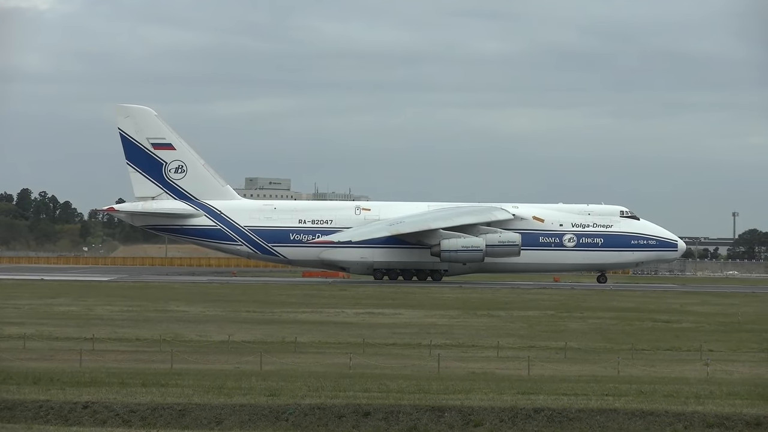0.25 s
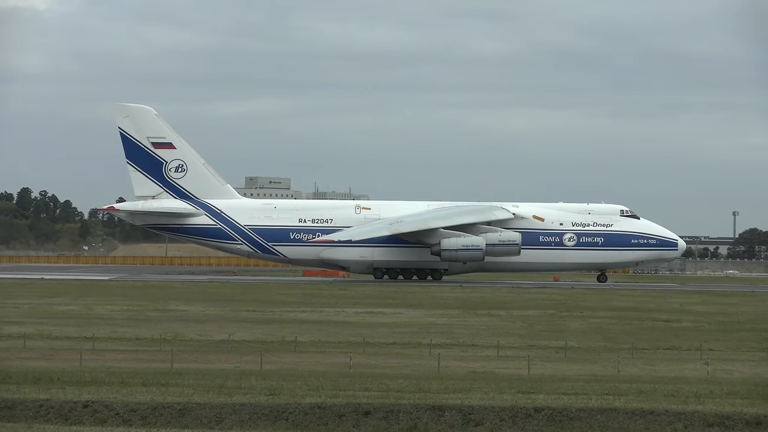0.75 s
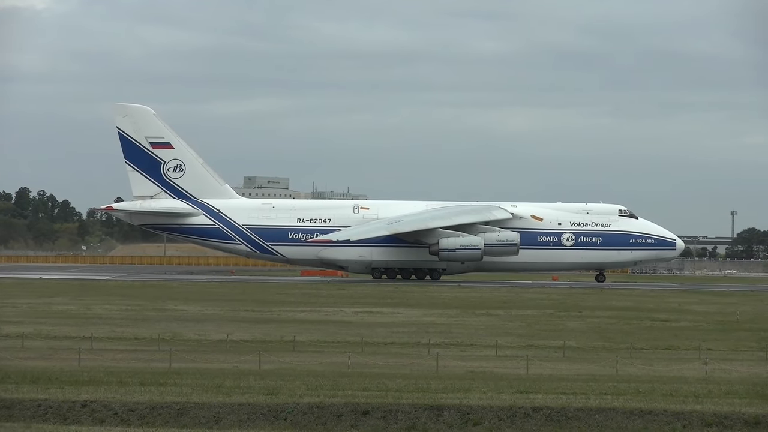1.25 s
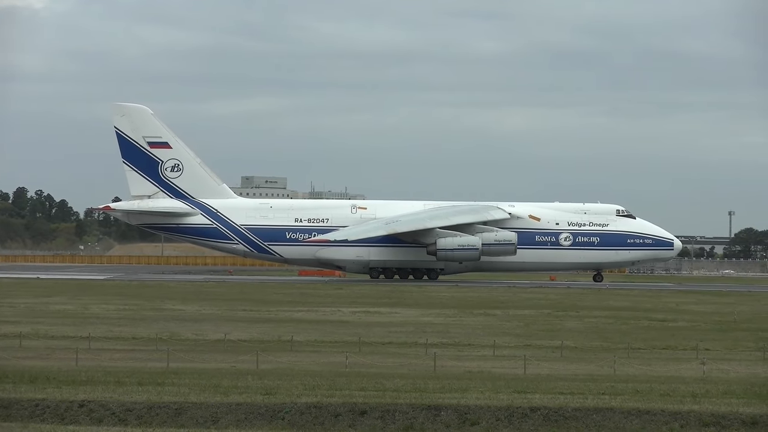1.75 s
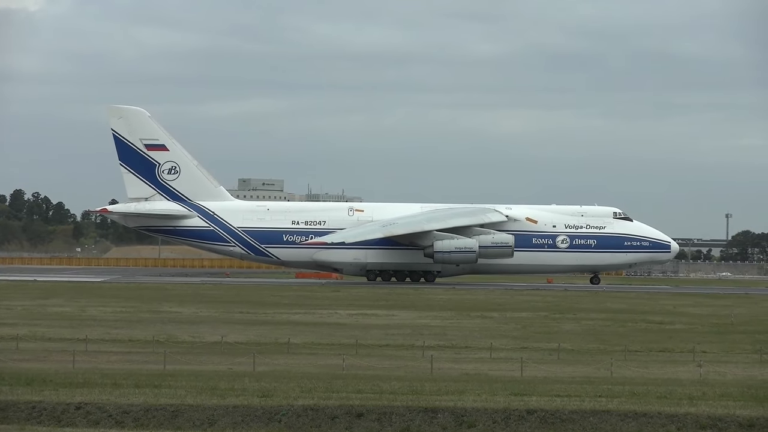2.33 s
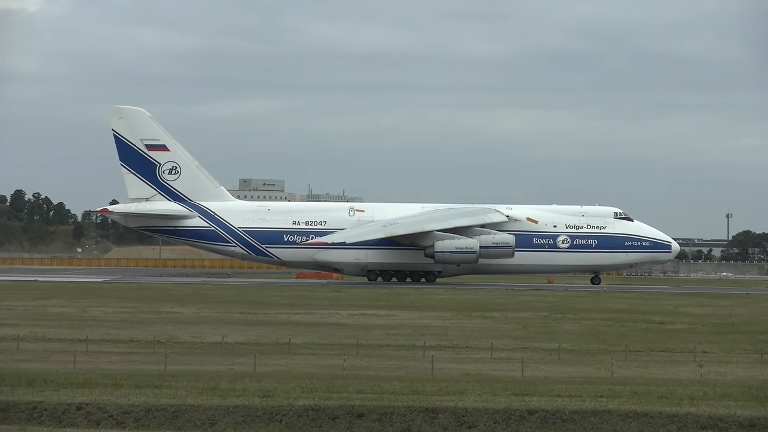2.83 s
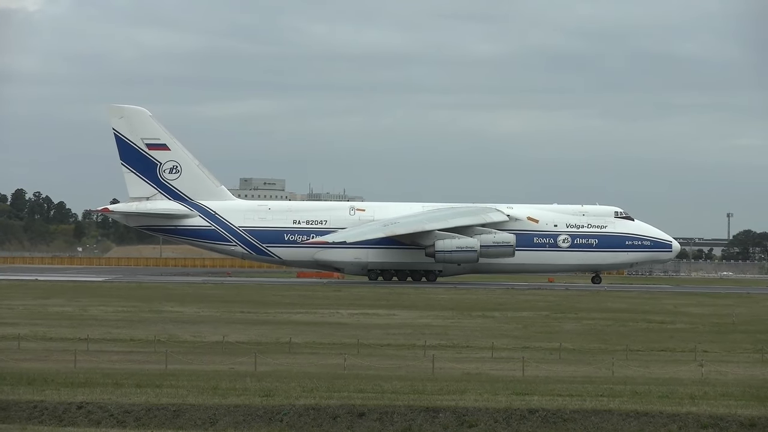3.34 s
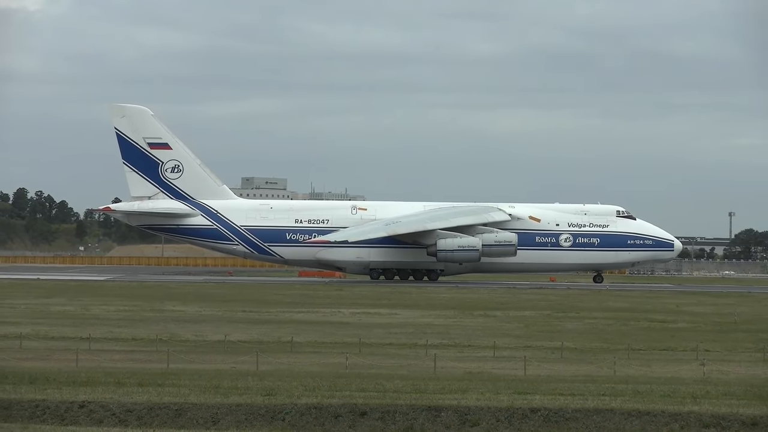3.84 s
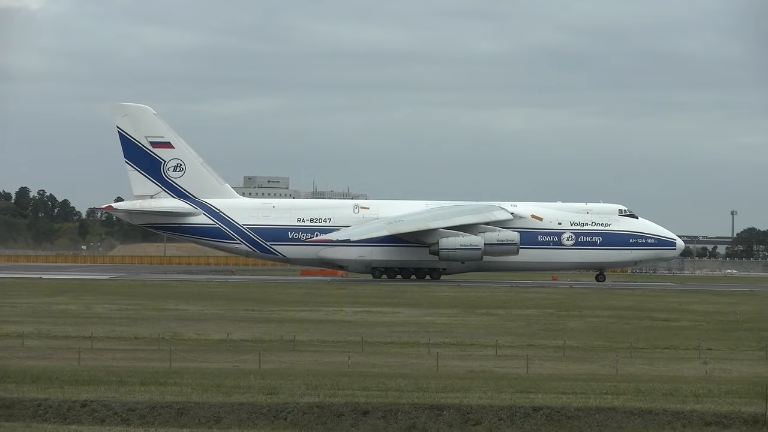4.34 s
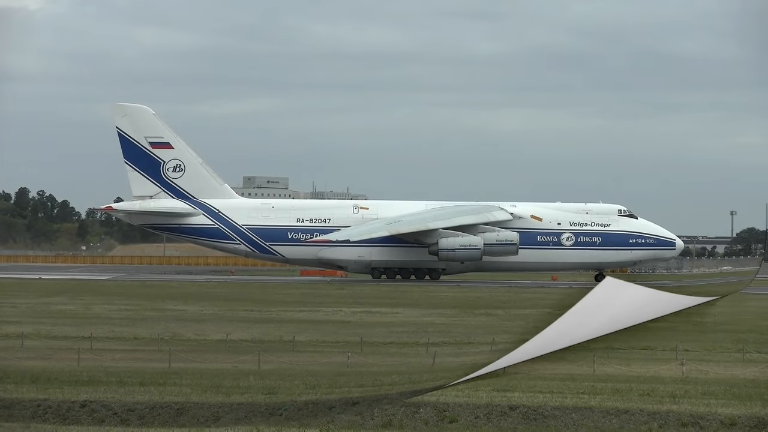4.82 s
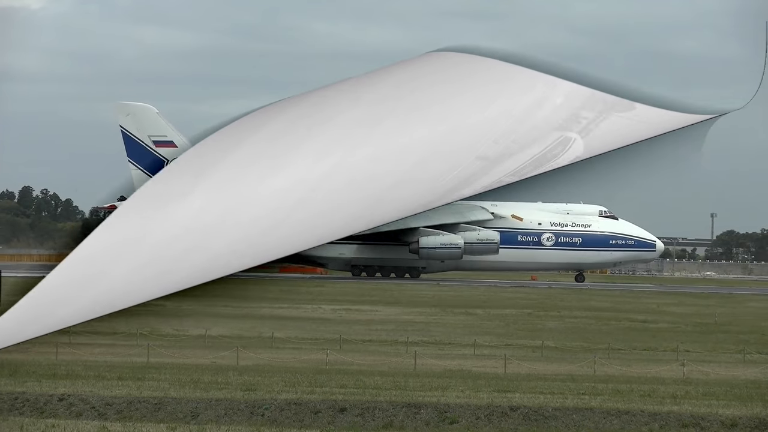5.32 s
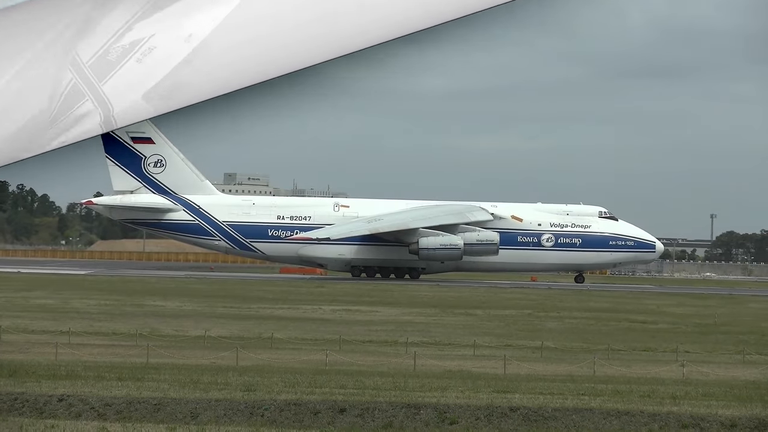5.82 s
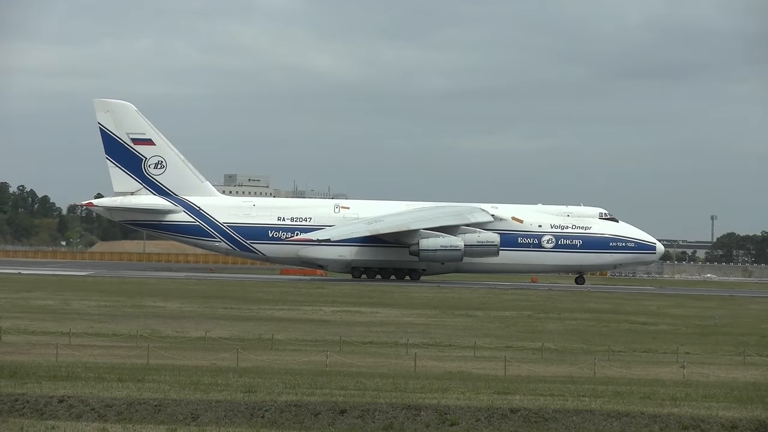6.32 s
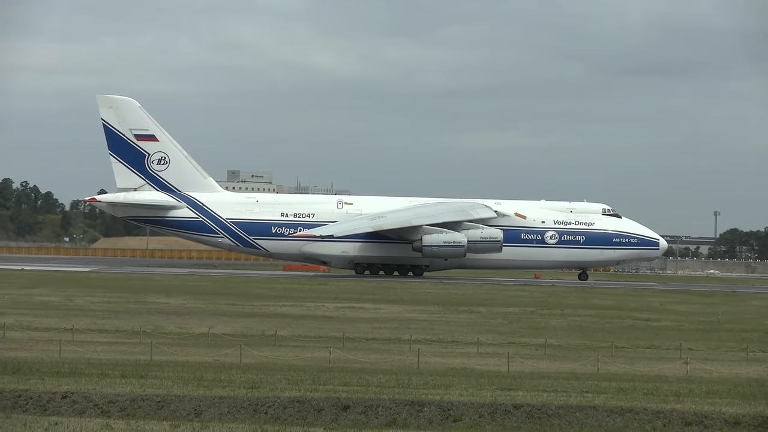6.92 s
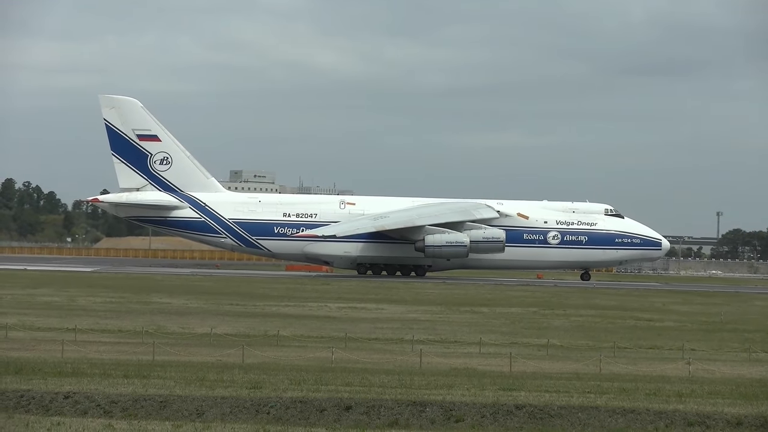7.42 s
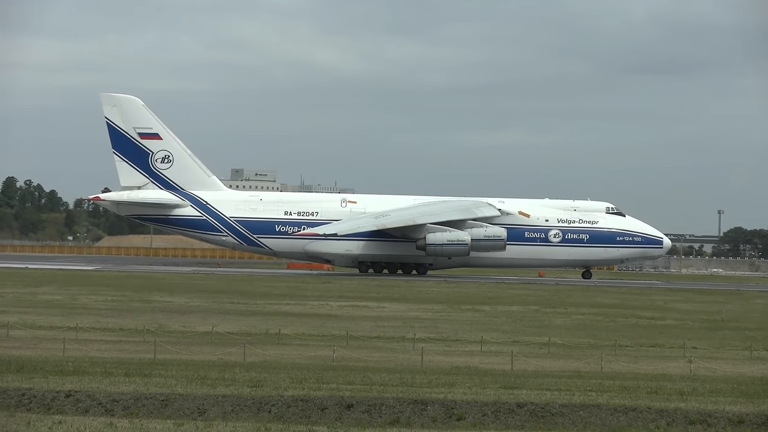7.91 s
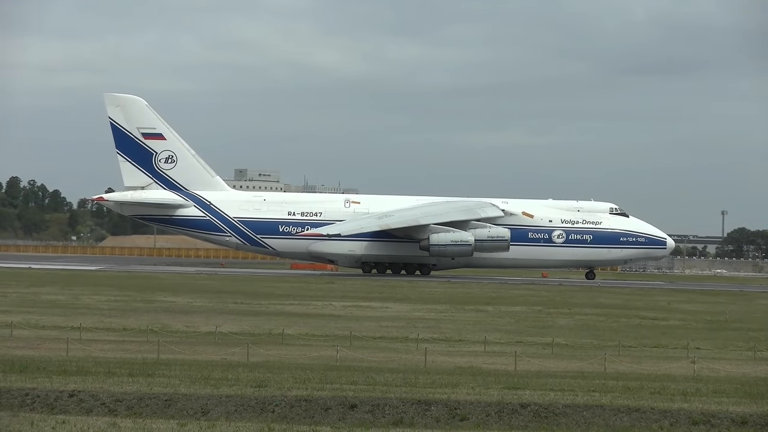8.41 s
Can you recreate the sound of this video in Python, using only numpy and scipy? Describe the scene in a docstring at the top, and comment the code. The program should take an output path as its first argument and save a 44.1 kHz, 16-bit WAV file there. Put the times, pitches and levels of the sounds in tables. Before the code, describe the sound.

A large four-engined cargo jet idles on a runway, heard across open grass by a distant stereo microphone, slightly left of centre. From 0 to about 5 s there is a steady, dense hiss, strongest around 1.5 to 4 kHz, finely grainy and fluttering, with blurred compressor whines near 2.4, 3.4 and 3.9 kHz over a low exhaust roar. A faint gust passes at the very start. The level sinks about 3 dB around 5.4 s. At 5.5 s the timbre switches quickly: the bass rumble grows, the whines change, and a beating hum near 260 Hz with overtones emerges, plus a wavering whine near 1.55 kHz. From 6 to 7 s wind buffets the microphone with short, dull, low thumps, strongest near 6.3 to 6.7 s. The hum eases, then firms around 7.5 to 8.3 s, as hiss and roar continue to the end, about 8.6 s.

```python
"""A four-engined cargo jet idles on a runway, heard from far across the grass: its fans hiss in broad
humps of filtered noise with narrow compressor whines, over the low noise of the exhaust roar.
Near 5.4 s the level dips briefly; the timbre shifts at 5.5 s, as a hum of beating sines at the
fans' shaft orders comes forward. Gusts, made of low noise, buffet the microphone most from 6 s to 7 s."""
import sys
import numpy as np
from scipy import signal
from scipy.fft import rfft, irfft, next_fast_len
from scipy.io import wavfile

SR = 44100
rng = np.random.default_rng(int(sys.argv[2]) if len(sys.argv) > 2 else 0)


def transcribe(signal):
    """Save signal, clipped to [-1, 1], as a 16-bit WAV file at the path in sys.argv[1]."""
    frames = np.atleast_2d(signal).T
    limited = np.clip(frames, -1, 1)
    pcm = np.round(limited * 32767).astype(np.int16)
    wavfile.write(sys.argv[1], SR, pcm)


N = 381906  # samples
FRAME, HOP = 2048, 512  # short-time spectra [samples]
HZ = np.fft.rfftfreq(FRAME, 1 / SR)
FRAME_S = np.arange(N // HOP + 5)[:, None] * HOP / SR
T = np.arange(N) / SR

# coherence of the engine noise at the two ports: (frequency [Hz], left-right correlation [0-1])
LIKENESS = [(60, 1), (400, 1), (1000, 0.95), (2200, 1), (2900, 0.93), (4100, 0.99), (4550, 0.85),
            (5200, 0.97), (6500, 0.98), (7400, .4), (8300, .96), (12000, 0.87)]


def amp(db):
    """Definition of the decibel: converts a level to an amplitude gain."""
    return 10 ** (np.asarray(db) / 20)


def evened(x):
    """Normalization: scales a signal to unit rms."""
    return x / np.sqrt(np.mean(x ** 2) + 1e-20)


def over_hz(table, hz=HZ):
    """Spectral interpolation: joins the columns of a spectrum on a log-frequency axis."""
    f, *columns = np.transpose(table)
    return [np.interp(np.log(hz + 1), np.log(f), c) for c in columns]


def over_time(table, t=FRAME_S):
    """Linear interpolation: reads the columns of a curve at the times t."""
    s, *columns = np.transpose(table)
    return [np.interp(t, s, c) for c in columns]


def bell(x, centre, width):
    """Gaussian of height 1, whose standard deviation is the width."""
    return np.exp(-.5 * ((x - centre) / width) ** 2)


def timbre_shift(before, after):
    """Linear crossfade of a value, from before 5.5 s to after 5.56 s."""
    share = np.interp(FRAME_S, [5.5, 5.56], [0, 1])
    return (1 - share) * before + share * after


def wander(rate_hz):
    """Low-pass random process: a slow curve of unit rms, one value a sample."""
    size = next_fast_len(N)
    spectrum = rfft(rng.standard_normal(size))
    low_pass = bell(np.fft.rfftfreq(size, 1 / SR), 0, rate_hz)
    return evened(irfft(spectrum * low_pass, size)[:N])


def patches(life_s, width_hz):
    """Random field of unit rms, Gaussian-smoothed over time and frequency."""
    field = rng.standard_normal((len(FRAME_S), len(HZ)))
    in_time = bell(2 * np.pi * np.fft.fftfreq(len(FRAME_S), HOP / SR), 0, 1 / life_s)[:, None]
    in_hz = bell(2 * np.pi * np.fft.rfftfreq(len(HZ), SR / FRAME), 0, 1 / width_hz)
    return evened(np.fft.irfft2(np.fft.rfft2(field) * in_time * in_hz, field.shape))


def noise(density, likeness):
    """Partial coherence: two channels share noise of the given amplitude per root Hz."""
    a, b, c, d = rng.standard_normal((4, len(FRAME_S), len(HZ)))
    same = np.clip(likeness, -1, 1)
    left = a + 1j * b
    right = same * left + np.sqrt(1 - same ** 2) * (c + 1j * d)
    scale = np.sqrt(1.5 * SR / FRAME)  # from density to bin amplitude, with the frames overlapping
    bins = (np.array([left, right]) * density * scale).swapaxes(1, 2)
    return signal.istft(bins, nperseg=FRAME, noverlap=FRAME - HOP)[1][:, :N]


def fan_hiss(grain_db=1.54, shimmer_db=.5, surge_db=0.41):
    """Broadband fan noise and turbulence-broadened compressor tones, under random modulation."""
    # broadband fan noise: (frequency [Hz], density [dB per Hz])
    fan_spectrum = [(700, -81), (1050, -67.5), (1450, -56), (1900, -53), (2600, -53.5), (3800, -53),
                    (4400, -63.5), (4900, -67), (5650, -62), (6550, -64), (7200, -82), (9500, -90.5),
                    (11000, -99), (15000, -102)]
    # humps and hollows of the fan noise:
    # (centre [Hz], width [Hz], gain before the shift [dB], gain after it [dB])
    humps = [(1158, 66, 4.5, 3), (1543, 40, 2, 1.5), (2163, 93, 5, 1.5), (2293, 80, -4.5, -4.5),
             (2390, 95, 2, -1.3), (2910, 94, -2.5, 2.5), (3138, 76, 2, 5.3), (3375, 84, 1.5, 5),
             (5300, 90, -2, 2), (8190, 150, -5, -4), (8530, 130, 2, 2), (8850, 110, -7, -9.5)]
    # compressor whines blurred by turbulence:
    # (centre [Hz], width [Hz], level before the shift [dB], level after it [dB])
    whine_bands = [(2424, 15, -37.5, -59), (2470, 12, -37, -50), (3140, 15, -57, -40),
                   (3440, 6.1, -43, -33.5), (3910, 14, -41, -59), (4500, 16, -62, -50),
                   (5100, 25, -62, -50), (5620, 40, -43, -55)]
    # as the ground dip fills, its upper flanks move: (centre [Hz], width [Hz], change [dB per dB of fill])
    flanks = [(1320, 360, 0.63), (2230, 260, -0.22)]

    shape_db = over_hz(fan_spectrum)[0]
    shape_db = shape_db + sum(timbre_shift(a, b) * bell(HZ, hz, width) for hz, width, a, b in humps)
    # each whine's power is spread over a Gaussian line of unit area
    whines = sum(timbre_shift(amp(a) ** 2, amp(b) ** 2) * bell(HZ, hz, width) / (width * np.sqrt(2 * np.pi))
                 for hz, width, a, b in whine_bands)
    path_db = timbre_shift(0, -0.43) + sink() + ground_dip(flanks) + swells()
    depth = np.interp(HZ, [1500, 7000], [.25, 1.2])  # the shimmer deepens toward the high frequencies
    path_db = path_db + shimmer_db * depth * patches(life_s=0.014, width_hz=1500)
    path_db = path_db + surge_db * patches(life_s=0.056, width_hz=290)
    path_db = path_db + grain_db * patches(life_s=0.02, width_hz=30)
    density = np.sqrt(amp(shape_db) ** 2 + whines)  # powers add
    return noise(density * amp(path_db), over_hz(LIKENESS)[0])


def exhaust(churn_db=1.24, heave_db=2.1, sink_share=0.66):
    """Jet noise under ground interference: a low rumble and a hump beside the echo's hollows."""
    # exhaust roar, hollowed near 350 and 1000 Hz by the echo off the ground:
    # (frequency [Hz], density before the shift [dB per Hz], density after it [dB per Hz])
    roar = [(20, -100, -95), (55, -75.5, -68), (126, -67.5, -64.5), (230, -69, -62.5), (302, -70, -68.5),
            (469, -69, -71), (565, -58.5, -61.5), (640, -59.5, -63.5), (788, -63, -61.5), (796, -66, -67.5),
            (980, -66.5, -69), (1500, -91, -94), (4000, -120, -120)]
    # as the ground dip fills, its lower flanks move: (centre [Hz], width [Hz], change [dB per dB of fill])
    flanks = [(850, 100, 1.02), (620, 130, 0.18)]

    drift_db = timbre_shift(0.27, 0.7) + sink_share * sink() + ground_dip(flanks) + swells()
    drift_db = drift_db + heave_db * patches(life_s=0.56, width_hz=180)
    drift_db = drift_db + churn_db * patches(life_s=0.046, width_hz=70)
    return noise(amp(timbre_shift(*over_hz(roar)) + drift_db), over_hz(LIKENESS)[0])


def fan_hum(waver=0.00382, fade_db=2.0):
    """Beating of harmonics: shaft orders of four fans at nearly equal speeds, fading on their way."""
    # the four fans: (mean shaft frequency [Hz], relative level [dB])
    engines = [(259, 0), (261.3, -11), (258, -17), (260.3, -15.5)]
    # harmonics of the shaft: (multiple of its frequency, relative level [dB])
    orders = [(1, -1.5), (2, -4.5), (3, -11)]
    # the hum rises, eases, then firms up: (time [s], level [dB])
    hum_level = [(4.6, -66), (5.55, -39), (5.9, -44), (7.1, -46), (7.5, -39), (8.3, -37.5), (8.66, -44)]
    whine_order, whine_db = 6, -34
    whine_joins_s, whine_rise_s = 4.9, 1.3

    hum, whine = np.zeros(N), np.zeros(N)
    for hz, db in engines:
        speed_hz = hz * (1 + waver * wander(14.9))
        angle = 2 * np.pi * (np.cumsum(speed_hz) / SR + rng.random())
        for k, order_db in orders:
            gain = amp(db + order_db + fade_db * wander(7))
            hum += gain * np.sin(round(k) * angle + .3 * wander(6))
        whine += amp(db + fade_db * wander(2.2)) * np.sin(whine_order * angle + 0.52 * wander(14))
    joined = np.clip((T - whine_joins_s) / whine_rise_s, 0, 1)
    return evened(hum) * amp(over_time(hum_level, T)[0]) + evened(whine) * amp(whine_db) * joined


def wind(lump_db=1.7, dull_hz=420):
    """Turbulent pressure at the microphone: lumpy gusts, and short low blows where eddies strike."""
    # spectrum of the wind noise: (frequency [Hz], relative density [dB per Hz])
    wind_spectrum = [(18, -26), (40, -28), (70, -9), (120, -6), (200, -3), (350, -5.5), (600, -6),
                     (1000, -14.5), (2000, -40), (5000, -50)]
    # gusts build, hold and die away: (time at full strength [s], hold [s], gain [dB])
    gust_rows = [(.25, .1, -61), (6.26, 0.55, -53.5), (8.2, .45, -64)]
    # the strongest buffets, Gaussian in time: (centre [s], peak level [dB], width [s])
    buffets = [(5.957, -28, 0.0091), (6.277, -27, 0.016), (6.333, -22.5, 0.0066), (6.373, -29, 0.02),
               (6.518, -22, 0.005), (6.6, -19.5, 0.0035), (6.627, -23.5, 0.013), (6.678, -24.5, .008),
               (6.879, -26.5, 0.0082)]

    colour = amp(over_hz(wind_spectrum)[0])
    likeness = np.interp(HZ, [80, 350], [.98, .75])  # small eddies reach one port only
    strength = np.max([gust(*row) for row in gust_rows], axis=0) * amp(lump_db * wander(22))
    gusts = noise(colour, likeness) * strength
    blows = sum(amp(db) * bell(T, s, length) for s, db, length in buffets)
    dull_colour = colour / np.hypot(1, (HZ / dull_hz) ** 2)
    return gusts + evened(noise(dull_colour, likeness)) * blows


def gust(top_s, hold_s, db):
    """Exponential growth and decay: one gust rises, holds and falls more slowly."""
    rise_db_per_s, fall_db_per_s = 17, 15.5
    below_db = rise_db_per_s * np.maximum(top_s - T, 0)
    below_db = below_db + fall_db_per_s * np.maximum(T - top_s - hold_s, 0)
    return amp(db - below_db)


def ground_dip(flanks):
    """Ground interference: drifting air fills and deepens the dip, moving its flanks in dB."""
    # level of the sound in the dip: (time [s], level [dB])
    dip_level = [(0.1, -28), (0.24, -31), (1.14, -28), (1.68, -32.5), (2.09, -28), (2.11, -26), (2.63, -28),
                 (2.75, -32.5), (3.06, -27), (3.13, -34.5), (5.02, -35), (5.57, -32), (6.18, -34.5),
                 (6.59, -35.5), (7.23, -32.5), (7.65, -36.5), (7.89, -36), (8.6, -32)]
    level_db = over_time(dip_level)[0]
    return (level_db - level_db.mean()) * sum(share * bell(HZ, hz, width) for hz, width, share in flanks)


def sink():
    """Gaussian level envelope: a brief dip of 3 dB, deepest at 5.4 s."""
    return -3 * bell(FRAME_S, 5.4, 0.31)


def swells():
    """Band-limited level modulation: the dB of brief swells and dips, each in one band."""
    # brief swells and dips of level: (centre [s], length [s], gain [dB], centre [Hz], width [Hz])
    band_swells = [(2.15, .08, -4, 3300, 450), (2.356, 0.039, 3, 3320, 450), (3.8, 0.2, 3, 507, 90),
                   (4.2, 0.32, 2, 2400, 280), (4.1, 0.83, -1.3, 3100, 600), (6.35, 0.12, -2.5, 5200, 1500),
                   (7.05, 0.29, 1.5, 5940, 2200), (7.08, 0.096, 2.5, 2000, 300), (7.2, 0.36, 4, 856, 110),
                   (7.662, 0.14, 4, 3200, 420)]
    return sum(db * bell(FRAME_S, s, length) * bell(HZ, hz, width)
               for s, length, db, hz, width in band_swells)


def hear(z):
    """Stereo level and phase differences between two ports, with the deepest bass rolled off."""
    # level balance of the microphone pair: (frequency [Hz], left minus right [dB])
    balance = [(60, -2), (170, 1), (450, 1.5), (1400, 6.5), (1950, 6.5), (2750, 3.5), (3150, 0.8),
               (3550, 4), (4200, 4), (4450, 12), (5000, 1.5), (5800, -0.5), (7000, 2.5), (7500, 0)]
    # phase difference of the pair: (frequency [Hz], lead of the left [rad])
    phase_lead = [(30, 0), (130, 0.44), (400, 0.17), (1200, 0.16), (2600, -.05), (2900, -.3), (3300, 0.044),
                  (4300, 0), (4600, -0.8), (5000, .15), (5300, -.25), (6000, 0)]
    port_cut_hz = 65

    lean_db, lead = over_hz(balance)[0], over_hz(phase_lead)[0]
    ports = amp([lean_db / 2, -lean_db / 2]) * np.exp(.5j * np.array([lead, -lead]))
    ports = ports / abs(ports.mean(0))  # sound alike in both ports keeps its mid level
    high_pass = HZ ** 2 / np.hypot(HZ ** 2, port_cut_hz ** 2)
    return z * (ports * high_pass)[:, :, None]


def scene(flutter_db=0.28):
    """Superposition: fluttering hiss, roar, hum and wind add; the jet stands a little to the left."""
    hiss = fan_hiss() * amp(flutter_db * wander(24))  # turbulence makes it flutter
    sound = hiss + exhaust() + fan_hum() + wind()
    z = signal.stft(sound, nperseg=FRAME)[2]
    return signal.istft(hear(z), nperseg=FRAME)[1][:, :N]


def record(dry):
    """Band limitation: the recorder's steep linear-phase low-pass at 15.2 kHz."""
    low_pass = signal.firwin(511, 15200, window=("kaiser", 9), fs=SR)
    return signal.oaconvolve(dry, low_pass[None], "same", axes=1)


dry = scene()
out = record(dry)
transcribe(out)
```